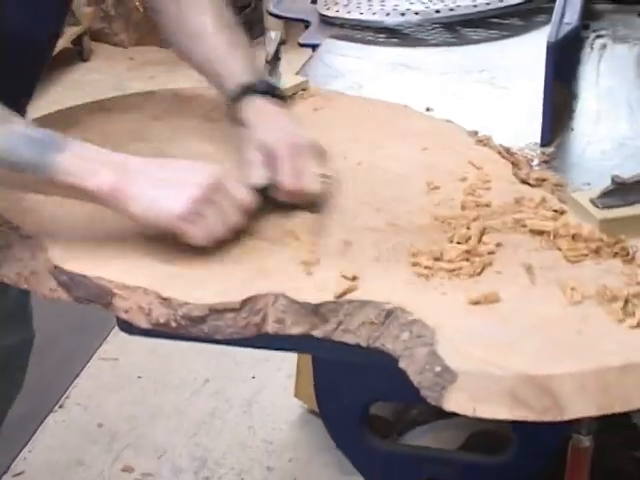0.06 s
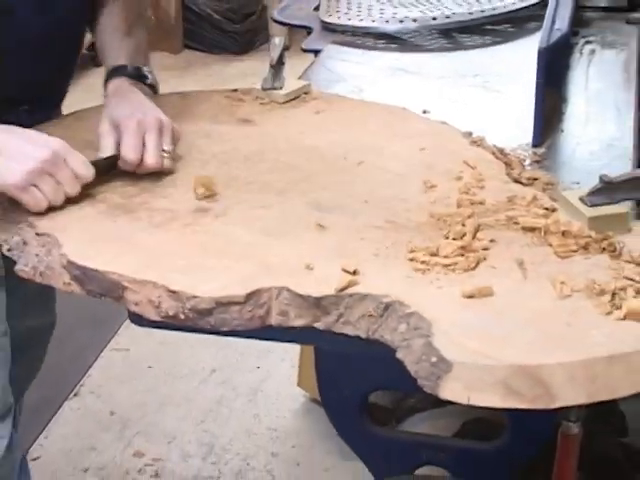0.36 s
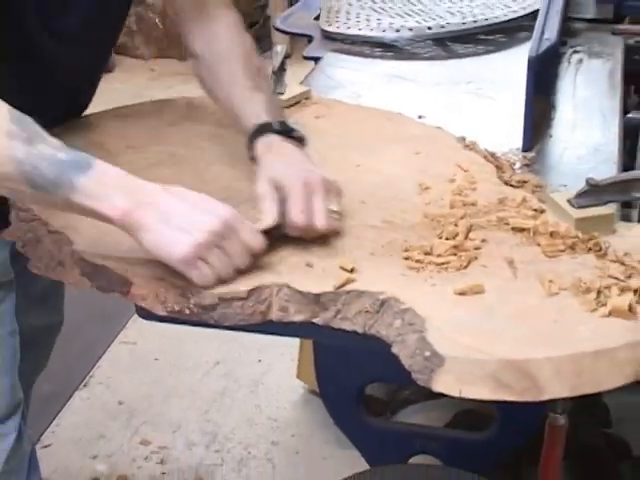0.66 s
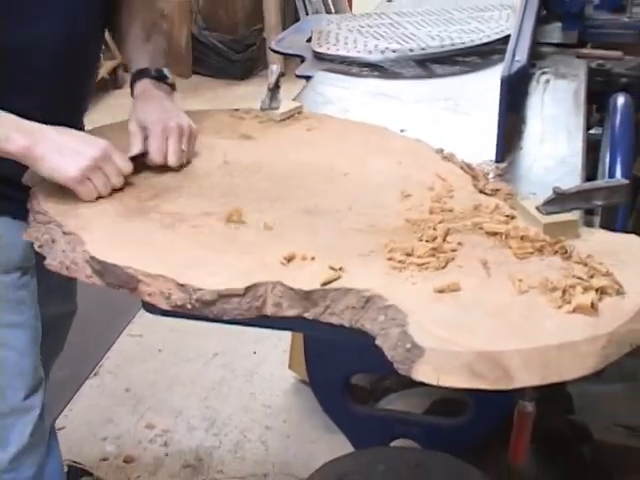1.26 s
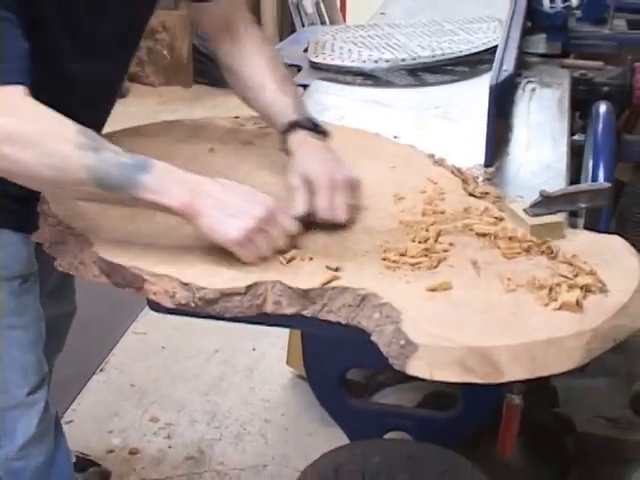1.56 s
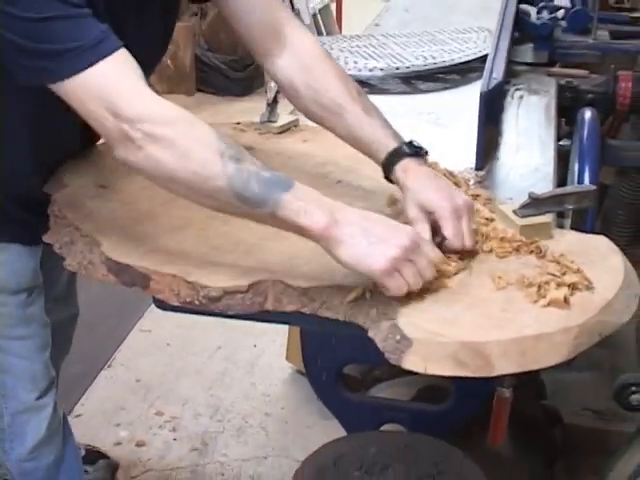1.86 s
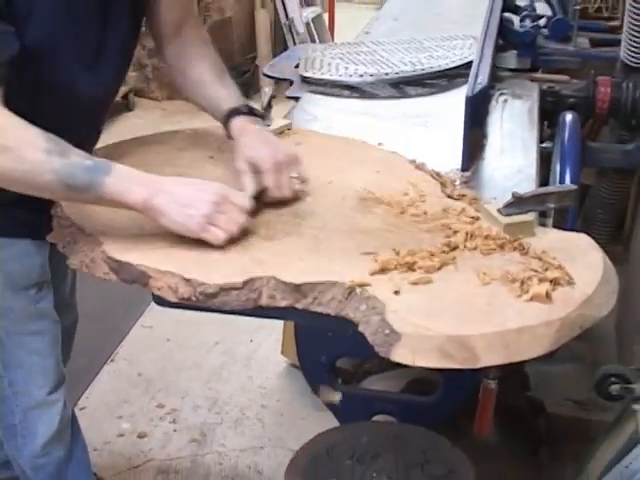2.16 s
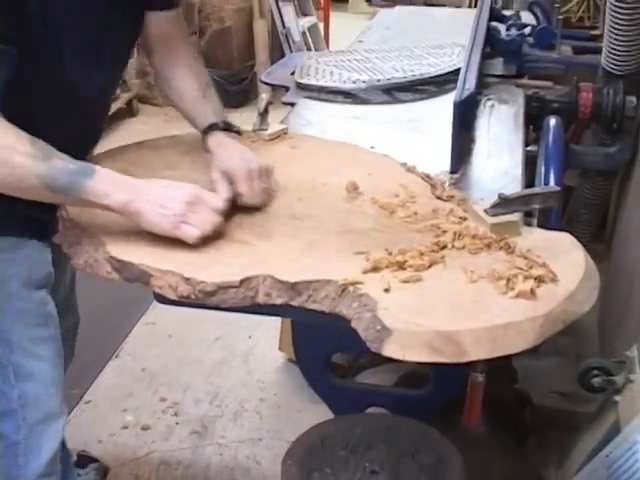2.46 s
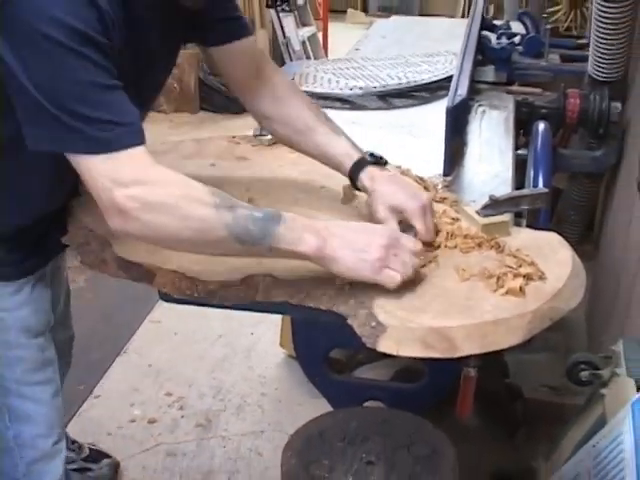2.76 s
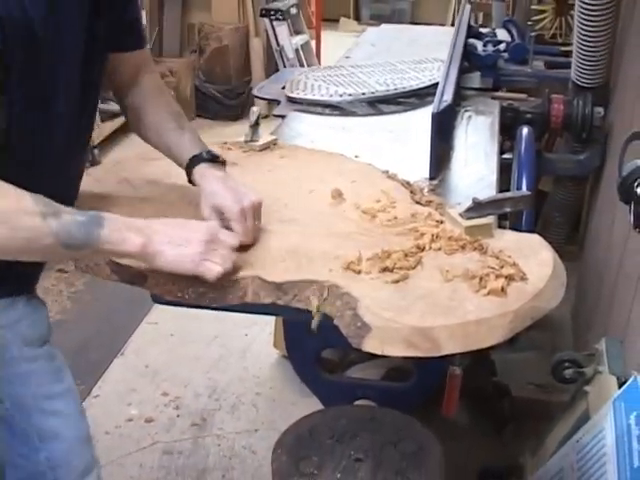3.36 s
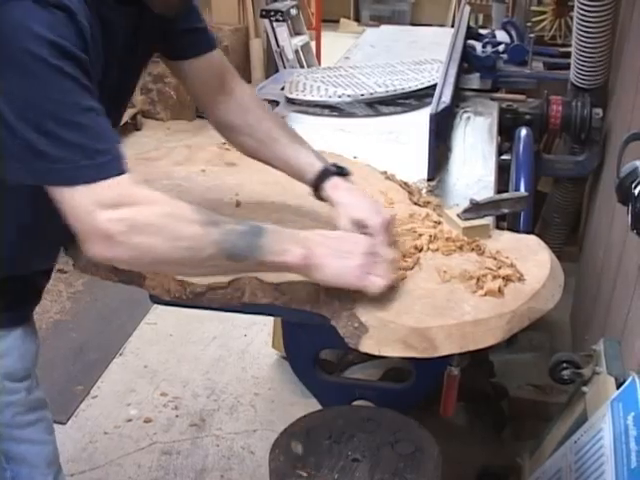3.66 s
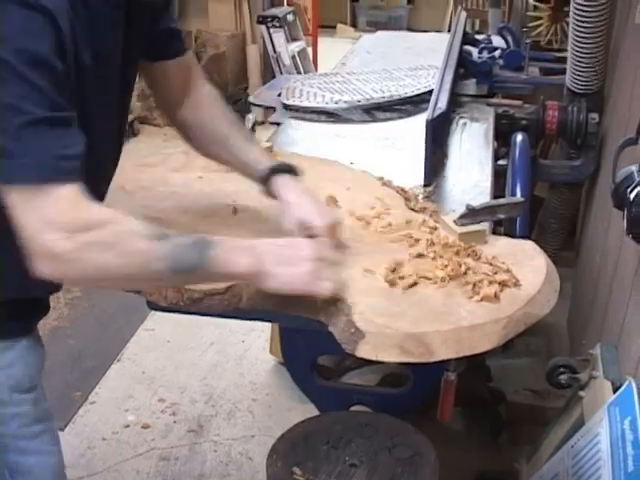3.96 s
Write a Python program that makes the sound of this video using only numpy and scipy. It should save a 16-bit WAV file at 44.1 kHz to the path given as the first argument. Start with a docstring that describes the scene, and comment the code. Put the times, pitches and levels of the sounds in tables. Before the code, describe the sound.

Hand scraping on wood in a small workshop: a light drag opens, then four firm, tearing strokes alternate with weaker rubbing as the blade returns. A brief hollow bump follows the third stroke, with slight room echo.

```python
"""A steel hand scraper works a wooden slab in a small workshop. First the blade is dragged lightly
and set down with a knock. Then come four pushes, with drags and knocks between them: fibres fracture,
exciting the resonances of blade and slab, and now and then the edge catches and chirps. The stand hums
under the first three pushes, and a hollow stutter follows the third. After the fourth, a knock and a
drag end the scene. Reflections from the walls and a quiet background run throughout."""
import sys
import numpy as np
from scipy import signal
from scipy.fft import rfft, irfft, next_fast_len
from scipy.io import wavfile
from scipy.ndimage import map_coordinates

SR = 44100
rng = np.random.default_rng(int(sys.argv[2]) if len(sys.argv) > 2 else 0)


def pcm_store(signal):
    """Save signal as 16-bit PCM."""
    levels = np.round(np.clip(np.atleast_2d(signal), -1, 1) * 32767)
    wavfile.write(sys.argv[1], SR, levels.astype(np.int16).T)


N = 176400
TIME = np.arange(N) / SR


def amp(db):
    """Amplitude ratio of a level in decibels."""
    return 10 ** (np.asarray(db) / 20)


def unit(x):
    """Normalisation to rms 1."""
    return x / np.sqrt(np.mean(x ** 2) + 1e-20)


def along(points, hz):
    """Interpolation of (f/Hz, value) points on a logarithmic frequency axis."""
    f, value = np.transpose(points)
    return np.interp(np.log(hz + 1), np.log(f + 1), value)


def envelopes(rows, fade_s=.014):
    """Amplitude envelopes: one per level column, fading to zero outside the stroke."""
    t, *levels = np.transpose(rows)
    gate = np.clip(np.minimum(TIME - t[0], t[-1] - TIME) / fade_s + .5, 0, 1)
    return np.array([gate * amp(np.interp(TIME, t, db)) for db in levels])


def wobble(rate_hz):
    """Random modulation: a smooth curve through rate_hz knots a second."""
    return map_coordinates(rng.standard_normal(int(N * rate_hz / SR) + 4), [TIME * rate_hz])


def filtered(x, response):
    """Linear filtering: the spectrum is multiplied by a frequency response."""
    size = next_fast_len(N + SR // 2)
    return irfft(rfft(x, size) * response(np.fft.rfftfreq(size, 1 / SR)), size)[..., :N]


def coloured(x, spectrum):
    """Spectral shaping by (f/Hz, level/dB) points, at rms 1."""
    return unit(filtered(x, lambda f: amp(along(spectrum, f))))


def resonance(modes, f):
    """Modal superposition: damped resonators of alternating sign."""
    return sum((-1) ** k * amp(db) * 1j * f * width / (hz * hz - f * f + 1j * f * width)
               for k, (hz, width, db) in enumerate(modes))


def burst(noise, envelope):
    """A transient: enveloped noise carrying the energy of its envelope."""
    return unit(noise * envelope) * np.sqrt(np.mean(envelope ** 2))


# background spectrum: f/Hz, level/dB
BACKGROUND = [(20, -19), (55, 8.5), (100, -8), (200, 1), (420, -6), (800, -4.5), (1800, -12.5),
              (4000, -18.5), (9000, -17.5), (14000, -34)]
def background(level_db=-55, side_db=-7):
    """Stationary noise of the shop, partly correlated between the channels."""
    mid, side = coloured(rng.standard_normal((2, N)), BACKGROUND)
    return amp(level_db) * np.array([mid + amp(side_db) * side, mid - amp(side_db) * side])


# reverberation time: f/Hz, T60/s
REVERB_TIME = [(150, 0.33), (1000, 0.31), (5000, 0.33), (14000, 0.072)]
def walls(early_db=2.5, early_t60_s=0.044):
    """Room impulse response, mid and side: early reflections and an exponentially decaying tail."""
    hz, t, spectra = signal.stft(rng.standard_normal((2, SR // 3)), SR, nperseg=256)
    decay = amp(-60 * t / along(REVERB_TIME, hz)[:, None])
    tail = signal.istft(spectra * decay, SR, nperseg=256)[1]
    length = tail.shape[1]
    early = rng.standard_normal(tail.shape) * amp(-60 * np.arange(length) / SR / early_t60_s)
    return unit(unit(tail) + amp(early_db) * unit(early)) / np.sqrt(length)


# colour of all reflections, and further colour of their side signal: f/Hz, level/dB
REFLECTIONS = [(100, -5.5), (600, -2.5), (2000, -3.5), (5000, -4.5), (14000, -4.5)]
REFLECTIONS_SIDE = [(50, -8), (130, 8), (300, -1), (600, -8.5), (1200, -4.5), (2200, 2), (14000, 5)]
def workshop(direct, move_s=.1):
    """Time-varying convolution: the reflections change every move_s as the scraper travels."""
    hop = int(move_s * SR)
    padded, echo = np.pad(direct, (hop, 2 * hop)), np.zeros((2, N + 2 * SR))
    for i in range(0, N + hop, hop):
        frame = padded[i:i + 2 * hop] * signal.windows.cosine(2 * hop)
        reflected = signal.fftconvolve(frame[None], walls(), axes=1)
        echo[:, i:i + reflected.shape[1]] += reflected
    mid, side = filtered(echo[:, hop:hop + N], lambda f: amp(along(REFLECTIONS, f)))
    side = filtered(side, lambda f: amp(along(REFLECTIONS_SIDE, f) - 2.0))
    return amp(-1.5) * np.array([direct + mid + side, direct + mid - side])


# swaying of the stand: start t/s, end t/s, level/dB
SWAYS = [(0.503, .66, -50), (0.683, 0.964, -48.5), (1.343, 1.565, -53), (2.557, 2.75, -60)]
# its hum: f/Hz, level/dB
STAND_HUM = [(20, 4.5), (38, -17), (49, 3), (62, 7), (100, -35), (200, -47)]
def stand():
    """Forced vibration: the stand hums low under the hardest pushes."""
    sway = sum(envelopes([(start, db), (end, db)], fade_s=0.027)[0] for start, end, db in SWAYS)
    return sway * coloured(rng.standard_normal(N), STAND_HUM)


# wooden impacts: t/s, level/dB
BUMP_HITS = [(2.969, -19.5), (2.986, -23), (2.997, -30), (3.016, -28)]
# their modes: f/Hz, level/dB, T60/s
HOLLOW_MODES = [(595, -14, 0.12), (656, -9, 0.046), (725, -2.5, 0.05), (836, -8, 0.045), (960, -9.5, 0.043),
                (1570, -19, 0.044)]
def bumps(attack_s=0.0033, clack_db=-11, clack_t60_s=0.094):
    """Damped free vibration: hollow wooden modes and a rough clack stutter as the stroke turns."""
    t, out = np.arange(SR // 4) / SR, np.zeros(N + SR)
    spectrum = [(300, -15.5), (600, -9), (780, 2.5), (1150, -21), (2000, -18), (4000, -25), (12000, -40)]
    rough = coloured(rng.standard_normal(N), spectrum)
    for k, (start, db) in enumerate(BUMP_HITS):
        tone = sum(amp(level + rng.normal(0, 1.5) - 60 * t / t60) * np.sin(2 * np.pi * hz * t)
                   for hz, level, t60 in HOLLOW_MODES)
        clack = rough[k * len(t):][:len(t)] * amp(clack_db - 60 * t / clack_t60_s)
        out[round(start * SR):][:len(t)] += amp(db) * (tone + clack) * (1 - np.exp(-t / attack_s))
    return out[:N]


# modes of the slab: f/Hz, bandwidth/Hz, level/dB
SLAB_MODES = [(177, 14, -8), (243, 8.3, 6), (335, 15, 7), (360, 27, -12), (470, 48, -24), (622, 53, 3),
              (749, 10, 2), (909, 16, -5.5), (1041, 69, -2), (1336, 13, -3.5), (1590, 54, -11),
              (2030, 16, -10), (2770, 23, 1.5)]
def slab(force, flat_gain=0.44):
    """Resonant filtering: the slab lifts its own modes above a flat response."""
    return filtered(force, lambda f: np.hypot(flat_gain, abs(resonance(SLAB_MODES, f))))


# the blade is set down: t/s, relative level/dB, tilt/(dB per octave), T60/s
LANDINGS = [(.1213, -24, 7, 0.16), (.141, -24, 4, 0.046), (1.1675, -30.5, -3, 0.23),
            (3.2058, -17.5, -1, 0.097), (3.2115, -15, 2, 0.056), (3.2175, -18.5, -4, 0.24),
            (3.515, -34, -13, .25), (3.889, -29, 4, 0.054)]
# spectrum before the tilt: f/Hz, level/dB
KNOCK_SPECTRUM = [(70, -30), (130, -15), (320, -9.5), (500, -8.5), (700, -1.5), (1400, 2), (2400, -8),
                  (8000, -22.5), (14000, -36)]
def knocks(crack_db=3, crack_t60_s=0.017):
    """Impact excitation: the blade lands with a crack and the slab rings briefly."""
    t, out = np.arange(SR // 2) / SR, np.zeros(N + SR)
    f = np.fft.rfftfreq(len(t), 1 / SR)
    wood = slab(rng.standard_normal(N), flat_gain=0.33)
    for k, (start, db, tilt, t60) in enumerate(LANDINGS):
        colour = [(hz, level + tilt * np.log2(hz / 1000)) for hz, level in KNOCK_SPECTRUM]
        segment = np.roll(wood, -k * len(t))[:len(t)]
        noise = irfft(rfft(segment) * amp(along(colour, f)) * (f > KNOCK_SPECTRUM[0][0]))
        decay = amp(-60 * t / t60) + amp(crack_db - 60 * t / crack_t60_s)
        out[round(start * SR):][:len(t)] += burst(noise, amp(db - 14) * decay)
    return out[:N]


# the edge catches: t/s, duration/s, level/dB, f/Hz, bandwidth/Hz
EDGE_BITES = [(0.124, 0.02, -39.5, 4030, 250), (0.479, 0.05, -41, 2720, 110),
              (1.232, 0.023, -37, 4150, 250), (1.399, 0.0061, -24.5, 4900, 2200),
              (1.426, 0.012, -24.5, 4300, 900), (1.481, 0.0034, -19, 6460, 6000),
              (1.489, 0.032, -24, 7800, 1100), (2.126, 0.028, -37.5, 3160, 120),
              (2.171, 0.066, -37, 1070, 260), (2.447, 0.028, -33, 2150, 1900),
              (2.54, 0.016, -34.5, 1555, 90), (2.674, 0.0084, -20, 8850, 700), (2.699, 0.018, -39, 720, 70),
              (2.734, 0.011, -36.5, 690, 130), (2.735, 0.015, -34.5, 1298, 70)]
def catches(release_t60_s=0.039):
    """Noise-driven resonance: the edge bites for a moment and chirps."""
    t, out = np.arange(SR // 4) / SR, np.zeros(N + SR)
    for start, duration, db, hz, width in EDGE_BITES:
        band = resonance([(hz, width, 0)], np.arange(SR // 2 + 1)) ** 2
        chirp = irfft(rfft(rng.standard_normal(SR)) * band)[:len(t)]
        envelope = amp(db - 60 * np.maximum(t - duration, 0) / release_t60_s)
        out[round(start * SR):][:len(t)] += burst(chirp, envelope)
    return out[:N]


def grain(stroke, top_hz, blur_hz=175, speed_exponent=.35):
    """Narrow-band noise of the passing wood grain: its pitch rises and falls with the stroke's speed."""
    first, last = max(int(stroke[0][0] * SR), 0), min(int(stroke[-1][0] * SR), N)
    speed = np.sin(np.pi * np.linspace(0, 1, last - first)) + 0.02013
    phase = 2 * np.pi * np.cumsum(top_hz * speed ** speed_exponent) / SR
    position = np.arange(last - first) * 2 * blur_hz / SR
    a, b = (map_coordinates(knots, [position]) for knots in rng.standard_normal((2, SR // 20)))
    return np.pad(unit(a * np.cos(phase) + b * np.sin(phase)), (first, N - last))


# friction spectrum at the reference grain pitch: f/Hz, level/dB
FRICTION = [(350, -37), (650, -13), (950, -4), (1400, 5.5), (2050, 3.5), (2700, -2), (4500, -29)]
def rubbing(wood, grain_hz, reference_hz=1565, exponent=0.26):
    """Friction noise through the slab: the spectrum shifts up when the grain passes faster."""
    shift = (grain_hz / reference_hz) ** exponent
    return coloured(wood, [(hz * shift, db) for hz, db in FRICTION])


def fibres(rate_hz, spread_db, judder_db, judder_hz, streams):
    """Shot noise: separate streams of tiny snaps, all clumped by the same stick-slip of the edge."""
    shape = (streams, N)
    snaps = (rng.random(shape) < rate_hz / SR) * rng.choice([-1, 1], shape)
    strength = amp(spread_db * np.clip(rng.standard_normal(shape), -3, 2))
    stick_slip = amp(judder_db * wobble(judder_hz) + 0.72 * wobble(45))
    return unit(snaps * strength * stick_slip)


# spectra of snapping fibres: f/Hz, level/dB
TEAR_SPECTRUM = [(1200, -13), (2300, -2.5), (3200, 1), (4400, 2), (5600, 1), (7000, -6.5), (9000, -10),
                 (15000, -116)]
HISS_SPECTRUM = [(4000, -39), (6200, -0.5), (7600, 3), (9200, 4), (10500, 0.5), (12500, -5), (14000, -10),
                 (15000, -51)]
def fracture(snaps):
    """Acoustic emission: two streams of snaps sound as tearing and as treble hiss."""
    return coloured(snaps[0], TEAR_SPECTRUM), coloured(snaps[1], HISS_SPECTRUM)


# per drag: t/s, then level/dB of rubbing, tearing, hiss, slab
DRAG_STROKES = [
    [(0.0, -44.5, -46.5, -54, -41), (0.044, -50, -53, -67, -64), (0.088, -57, -60, -77, -55),
     (0.11, -56, -51, -50, -75)],
    [(0.13, -58, -36, -37, -30.5), (0.15, -40.5, -39.5, -41.5, -40.5), (0.194, -46.5, -49.5, -51, -45),
     (0.23, -66, -48, -52, -70)],
    [(0.245, -44, -40, -44, -56), (0.29, -31, -38, -43.5, -39.5), (0.36, -40.5, -50, -61, -47)],
    [(1.0, -35, -37, -40, -40), (1.008, -45, -47, -53, -53), (1.076, -59, -53.5, -56, -65),
     (1.16, -63, -49.5, -49, -74)],
    [(1.168, -58, -45, -40.5, -51), (1.24, -44.5, -36, -37.5, -58), (1.278, -38.5, -31, -38.5, -54),
     (1.312, -36, -43.5, -48, -49), (1.35, -47, -55, -61, -54)],
    [(1.92, -44, -56, -55, -49), (1.956, -37, -42.5, -49.5, -41.5), (2.02, -73, -59, -69, -57)],
    [(2.02, -43, -47.5, -52, -44), (2.126, -37, -34, -38.5, -44.5), (2.354, -36.5, -41, -49, -42),
     (2.42, -43.5, -57, -65, -47)],
    [(3.12, -60, -53.5, -51.5, -68), (3.172, -54, -56, -54, -53), (3.2, -43, -48, -51, -53)],
    [(3.225, -39, -41.5, -45, -38), (3.303, -38, -42, -52.5, -60), (3.345, -45.5, -58, -67, -45.5),
     (3.38, -53, -59, -72, -57)],
    [(3.87, -51, -52, -53, -43), (3.888, -34.5, -43.5, -51, -38.5), (3.968, -43, -39.5, -46, -52),
     (4.0, -32, -37, -44, -56)],
]
# grain pitch at full speed, per drag: f/Hz
DRAG_PITCHES = [1430, 1000, 1496, 1075, 1304, 1564, 1128, 1460, 1284, 980]
# body of the slab under a drag: f/Hz, level/dB
DRAG_SLAB = [(120, -14), (240, -8), (320, -5.5), (450, 0), (650, -1.5), (850, -1.5), (1500, -46)]
def drags(mix_db=(-0.68, 0.81, 0.54, -2.1), grain_db=-9.5):
    """Sliding friction: light return strokes rub, tear a little and sound the note of the grain."""
    *snaps, on_slab = fibres(rate_hz=11000, spread_db=2, judder_db=0.9, judder_hz=260, streams=3)
    tear, hiss = fracture(snaps)
    wood = slab(on_slab)
    body = coloured(wood, DRAG_SLAB)
    out = np.zeros(N)
    for stroke, grain_hz in zip(DRAG_STROKES, DRAG_PITCHES):
        gains = envelopes(stroke)
        layers = np.array([rubbing(wood, grain_hz), tear, hiss, body])
        out += amp(mix_db) @ (gains * layers)
        out += amp(grain_db) * gains[0] * grain(stroke, grain_hz, blur_hz=133.7)
    return out


# blade modes, which change with the grip, per push: f/Hz, bandwidth/Hz, level/dB
BLADE_MODES = [
    [(4280, 870, 1.5), (5470, 1100, 4), (8030, 290, 3.5), (8780, 280, 2.5), (11600, 240, -10)],
    [(4660, 620, -3), (6660, 650, -7.5), (8200, 530, -1.5), (9600, 240, -14)],
    [(7600, 300, -10), (9040, 510, -3), (10200, 400, -22), (11340, 240, -6.5)],
    [(4770, 780, -10.5), (7500, 1400, -14), (8650, 320, -7.5)],
]
# ring relative to the hiss envelope, per push: level/dB
BLADE_LEVELS = [-4, -1.5, -1.5, -3.5]
def blade(force, push, flex_s=.0004, flex_hz=14):
    """Frequency modulation: the resonances of the steel waver as the blade flexes."""
    ring = filtered(force, lambda f: resonance(BLADE_MODES[push], f))
    warped_time = TIME + flex_s * wobble(flex_hz)
    return amp(BLADE_LEVELS[push]) * unit(map_coordinates(ring, [warped_time * SR], mode="wrap"))


# per push: t/s, then level/dB of tearing, hiss, rubbing, slab
PUSH_STROKES = [
    [(0.37, -49, -58, -45, -50), (0.412, -37, -44, -34, -60), (0.422, -29.5, -38, -30, -63),
     (0.506, -29, -31.5, -35.5, -45), (0.672, -33.5, -23, -36, -35.5), (0.73, -29.5, -29, -41.5, -49.5),
     (0.872, -32.5, -37, -35, -56), (0.942, -41, -49.5, -34, -50), (0.978, -56, -64, -44, -52),
     (1.0, -60, -52, -45, -57)],
    [(1.35, -43, -56, -51, -43), (1.368, -38.5, -41.5, -40.5, -52), (1.432, -25.5, -25.5, -38, -54),
     (1.484, -28, -23.5, -35, -35.5), (1.582, -37, -26.5, -40, -39), (1.696, -31, -30.5, -41, -46),
     (1.852, -34, -35.5, -38.5, -59), (1.886, -38, -47, -34.5, -59), (1.92, -52, -60, -57, -57)],
    [(2.428, -38.5, -49, -38.5, -60), (2.485, -25.5, -24, -44, -58), (2.54, -31.5, -27.5, -44, -41.5),
     (2.642, -31, -23.5, -39.5, -39), (2.748, -30.5, -28.5, -36, -39.5), (2.83, -34, -38.5, -38, -57.5),
     (2.87, -51, -54.5, -42.5, -48), (2.94, -53, -65, -58, -69)],
    [(3.38, -59, -69, -49, -53), (3.414, -39, -42, -41.5, -64), (3.542, -31.5, -32.5, -38, -59),
     (3.632, -28, -26.5, -42, -64), (3.706, -28, -27.5, -37, -56), (3.764, -28, -28, -40, -71),
     (3.82, -33, -37, -33.5, -51), (3.87, -52, -56, -47, -57)],
]
# grain pitch at full speed, per push: f/Hz
PUSH_PITCHES = [1914, 1856, 1346, 1910]
# body of the slab under a push: f/Hz, level/dB
PUSH_SLAB = [(70, -26), (120, -50), (170, -13), (270, -14), (330, -3.5), (450, 2), (650, -4), (850, -6.5),
             (1500, -36)]
# mode of the part of the slab where each push runs: f/Hz, bandwidth/Hz, relative level/dB
LOCAL_MODES = [(321, 53, -3.5), (343, 74, -3), (206, 89, -6.5), (200, 74, -1)]
def pushes(mix_db=(-1, -1, -1, -4), grain_db=-17):
    """Source and filter: fibres snapping under the cut tear, hiss and drive the blade and the slab."""
    *snaps, force, on_slab = fibres(rate_hz=13000, spread_db=3, judder_db=1, judder_hz=420, streams=4)
    tear, hiss = fracture(snaps)
    wood = slab(on_slab)
    body = coloured(wood, PUSH_SLAB)
    out = np.zeros(N)
    for push, (stroke, mode, grain_hz) in enumerate(zip(PUSH_STROKES, LOCAL_MODES, PUSH_PITCHES)):
        gains = envelopes(stroke)
        _, hiss_gain, rub_gain, slab_gain = gains
        layers = np.array([tear, hiss, rubbing(wood, grain_hz), body])
        boom = amp(mode[2]) * unit(filtered(force, lambda f: resonance([mode], f)))
        out += amp(mix_db) @ (gains * layers)
        out += hiss_gain * blade(force, push) + slab_gain * boom
        out += amp(grain_db) * rub_gain * grain(stroke, grain_hz)
    return out


def scene():
    """Superposition: scraper, slab and stand sound in the room, over its background."""
    return workshop(pushes() + drags() + catches() + knocks() + bumps() + stand()) + background()


# left channel over right: f/Hz, level/dB
BALANCE = [(50, 0.8), (250, 4.5), (600, 1.5), (12000, 1.2)]
def record(dry, top_hz=14950):
    """Level difference and band limit: the microphone pair leans left and keeps nothing above top_hz."""
    split = np.array([[.5], [-.5]])
    return filtered(dry, lambda f: amp(along(BALANCE, f) * split) * (f < top_hz))


dry = scene()
out = record(dry)
pcm_store(out)
```